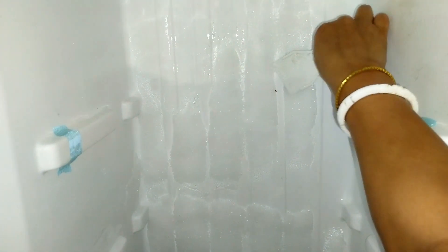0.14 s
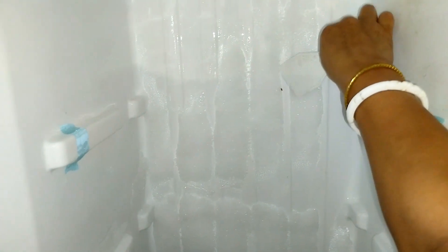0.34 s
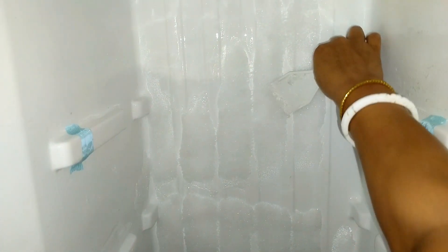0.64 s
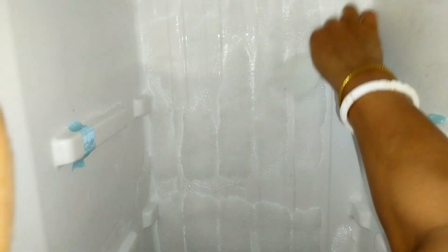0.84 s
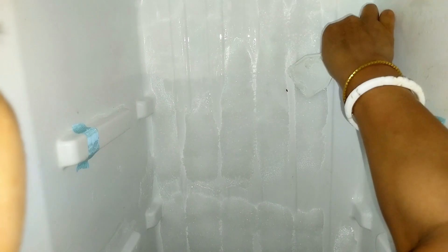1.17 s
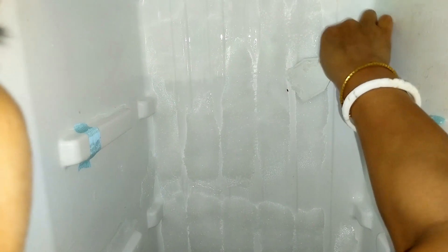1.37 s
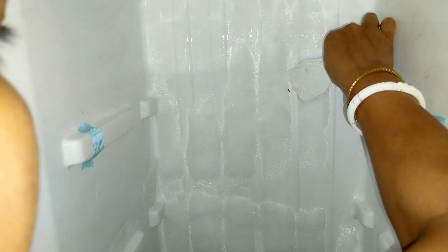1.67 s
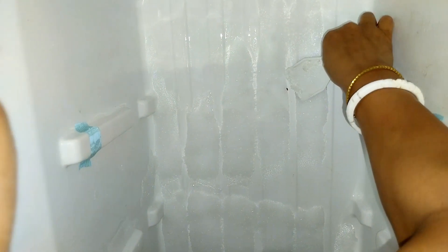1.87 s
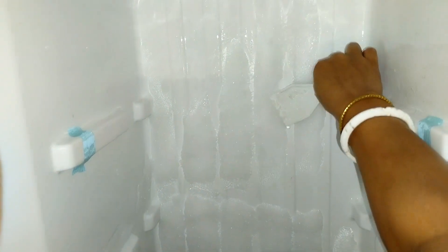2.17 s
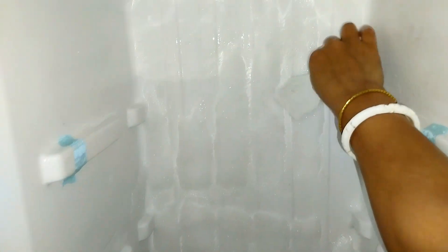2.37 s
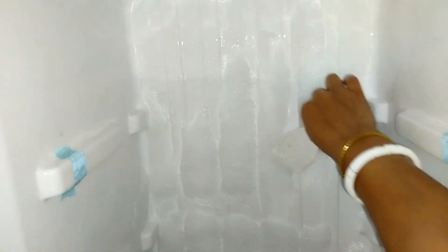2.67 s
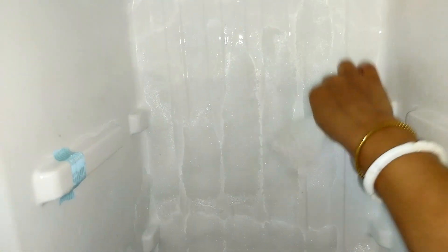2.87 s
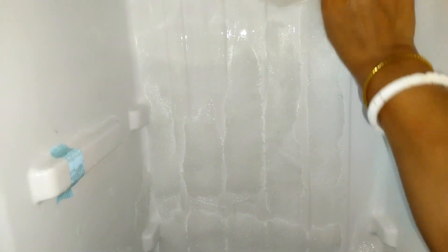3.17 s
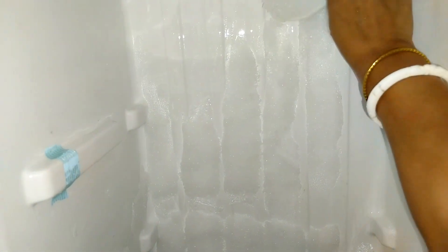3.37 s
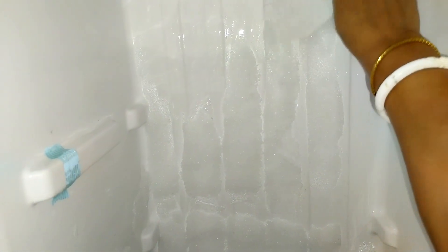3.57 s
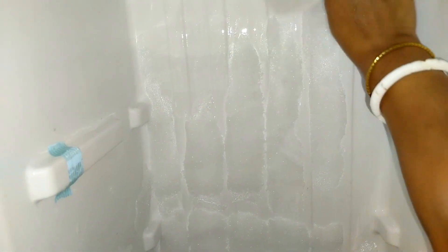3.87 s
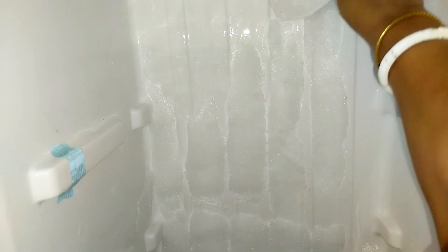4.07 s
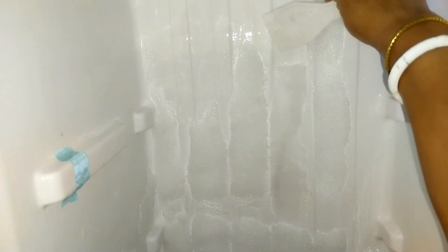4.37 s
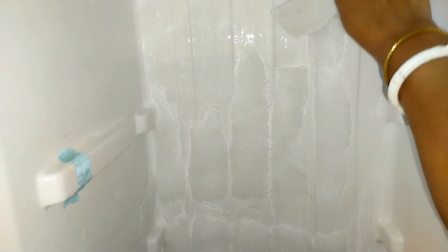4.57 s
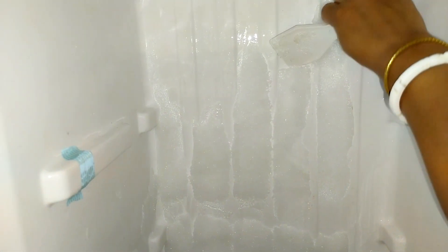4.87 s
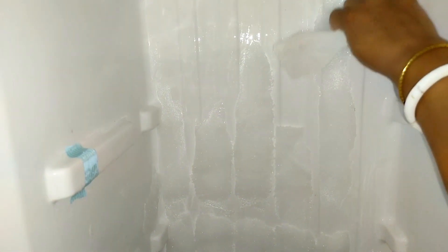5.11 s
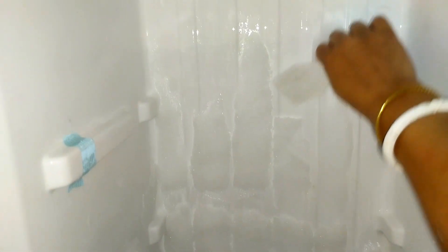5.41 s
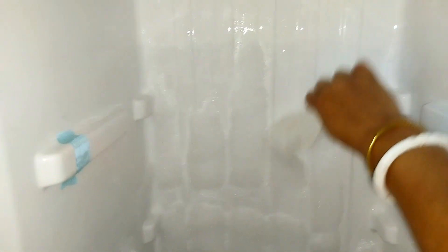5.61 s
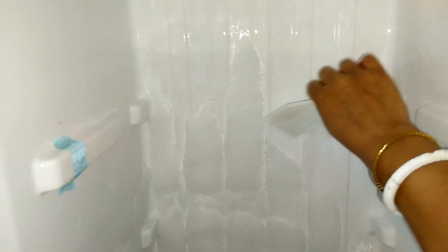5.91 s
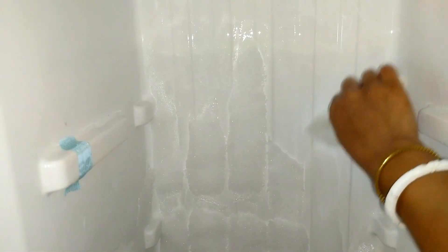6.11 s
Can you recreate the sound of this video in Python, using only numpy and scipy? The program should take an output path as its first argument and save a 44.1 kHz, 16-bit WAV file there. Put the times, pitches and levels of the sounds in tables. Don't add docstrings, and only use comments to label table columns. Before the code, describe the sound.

Irregular hand scraping of ice in a plastic-lined cabinet, recorded from its open door by a small close microphone. Bright, splintery rasps alternate with near-quiet gaps over faint low rumble. Crusts snap, packed frost crunches, ice plates tick and ring briefly, and bumps make the liner knock hollowly. The breaks grow stronger toward the end, peaking in an overloaded crack, then quick scrapes and squeaky chirps.

```python
import sys
import numpy as np
from scipy import signal
from scipy.fft import rfft, irfft, next_fast_len
from scipy.io import wavfile
from scipy.ndimage import uniform_filter1d, map_coordinates

SR = 44100
rng = np.random.default_rng(int(sys.argv[2]) if len(sys.argv) > 2 else 0)


def rack_gain(trim_db):
    fader = np.asarray(trim_db, float)
    return 10 ** (fader / 20)


def master_out(mix):
    frames = np.transpose(np.atleast_2d(mix))
    ceiling = np.clip(frames, -1, 1)
    pcm = np.round(ceiling * 32767).astype(np.int16)
    wavfile.write(sys.argv[1], SR, pcm)


N = 275625

# start_s, peak_db, crumble_s, plate_hz
SLAB_BREAKS = [(1.0003, -16, 0.011, 3440), (2.6539, -7.5, .0046, 4940), (3.1465, -21.5, 0.0056, 2150),
               (3.287, -10.5, 0.0046, 1624), (3.5743, -2, 0.0072, 3900), (3.8928, -6.5, 0.0025, 1686),
               (4.2873, -3, 0.0072, 3386), (4.529, 4.5, 0.0079, 3640), (4.6612, -14.5, 0.018, 3700),
               (4.7405, -8.5, .0051, 2620), (5.1545, 16, 0.005, 3420), (5.242, 0, .017, 3290),
               (5.2776, 5, 0.0061, 1575), (5.677, 8, 0.0042, 4640), (6.195, -7.5, 0.012, 5360)]


def unit(x):
    return x / np.sqrt(np.mean(x ** 2) + 1e-20)


def along(points, hz):
    knot_hz, value = np.transpose(points)
    return np.interp(np.log(hz + 1), np.log(knot_hz + 1), value)


def filtered(x, response):
    m = next_fast_len(N + SR // 2)
    return irfft(rfft(x, m) * response(np.fft.rfftfreq(m, 1 / SR)), m)[:N]


def coloured(x, spectrum):
    def gain(hz):
        return rack_gain(along(spectrum, hz))
    power = np.mean(gain(np.linspace(0, SR / 2, 4096)) ** 2)
    return filtered(x, gain) / np.sqrt(power)


def resonant(x, modes):
    def gain(hz):
        total = 0
        for k, (centre, width, db) in enumerate(modes):
            damping = 1j * hz * width
            total = total + (-1) ** k * rack_gain(db) * damping / (centre * centre - hz * hz + damping)
        return total
    power = np.mean(np.abs(gain(np.linspace(0, SR / 2, 16384))) ** 2)
    return filtered(x, gain) / np.sqrt(power)


def wobble(rate):
    knots = rng.standard_normal(int(N / SR * 2000) + 8)
    return map_coordinates(knots, [np.arange(N) * rate / SR])


def add(track, s, piece):
    part = track[round(s * SR):][:len(piece)]
    part += piece[:len(part)]


def forces():
    # time_s, pressure_db
    blade_drag = [(0.0, -44.5), (0.32, -64.5), (0.54, -29.5), (0.68, -46), (0.94, -38), (1.22, -52.5),
                  (1.95, -55.5), (2.12, -31.5), (2.45, -47), (2.65, -23), (2.94, -36), (3.13, -54.5),
                  (3.78, -49.5), (4.04, -56), (5.2, -54), (5.33, -24.5), (5.69, -32), (6.25, -32.5)]
    # start_s, swell_s, fade_s, start_db, peak_db
    hard_strokes = [(0.374, 0.11, 0.034, -20, -7.5), (0.904, 0.025, 0.062, -20.5, -14),
                    (1.973, 0.048, 0.064, -22.5, -4.5), (2.45, 0.064, 0.12, -25.5, -9.5),
                    (3.738, 0.17, 0.038, -32, -49), (4.652, 0.079, 0.073, -34.5, -27.5),
                    (5.468, 0.011, 0.039, -49, -6), (5.6, 0.029, 0.018, -10, -5),
                    (5.686, 0.077, 0.022, -10, -17.5), (5.788, 0.045, 0.024, -16.5, -8),
                    (6.205, 0.044, .03, -19, -16)]
    # time_s, push_db
    blade_lean = [
        (0, 4),
        (.45, -0.5),
        (.75, -3),
        (.97, 5),
        (1.7, -2.5),
        (3.2, 1),
        (5.6, 1),
        (5.68, -11),
        (6.1, -5),
        (6.25, 2),
    ]
    hold, hold_db = 0.42, 6.5
    fade_db = 34.5
    clock = np.arange(N) / SR
    slip = 0.28 * wobble(28) + 1.5 * wobble(76)
    contacts = [(blade_drag, 1)]
    for s, swell, fade, start_db, peak_db in hard_strokes:
        peak_s = s + swell
        stroke = [(s, start_db), (peak_s, peak_db), (peak_s + hold * fade, peak_db - hold_db),
                  (peak_s + fade, peak_db - fade_db)]
        contacts.append((stroke, 0.5))
    power = np.zeros((3, N))
    for rows, slip_share in contacts:
        s, db = np.transpose(rows)
        touch = np.clip(np.minimum(clock - s[0] + 0.012, s[-1] + 0.0016 - clock) / 0.0034, 0, 1)
        grind_db = np.interp(clock, s, db)
        levels = np.array([grind_db, -15 + 0.8 * grind_db, -16.5 + 0.67 * grind_db])
        power += touch * rack_gain(2 * (levels + slip_share * slip))
    lean_db = np.interp(clock, *np.transpose(blade_lean))
    power[2] *= rack_gain(2 * lean_db + 5.7 * wobble(13) + 6 * wobble(35))
    return power


def grit(lumps_db, patchy_db):
    z = signal.stft(rng.standard_normal(N), nperseg=256)[2]
    patches = uniform_filter1d(rng.standard_normal(z.shape), 5, 0)
    patches = unit(uniform_filter1d(patches, 4, 1))
    noise = signal.istft(z * rack_gain(patchy_db * patches), nperseg=256)[1][:N]
    return unit(noise * rack_gain(lumps_db * wobble(350) + 2.46 * wobble(1600)))


def boom():
    # time_s, level_db
    shake_levels = [(0.0, -57), (0.33, -51), (1.65, -43), (1.86, -64), (1.98, -37.5), (3.71, -60),
                    (3.93, -37.5), (4.07, -60), (5.22, -35.5), (6.04, -48), (6.25, -40)]
    # mode_hz, width_hz, level_db
    body_modes = [(92.7, 130, -7), (122.2, 10.4, 3.5), (141.7, 13.7, -5)]
    shake = rack_gain(np.interp(np.arange(N) / SR, *np.transpose(shake_levels)) + 2.4 * wobble(10))
    return shake * unit(resonant(resonant(rng.standard_normal(N), body_modes), body_modes))


def hush():
    # frequency_hz, density_db
    hush_spectrum = [(15, -28), (25, 13.5), (49, -0.5), (76, -8), (137, 1), (194, -38), (473, -6),
                     (855, -29), (1820, -20), (2030, -45), (2260, -38), (7810, -66), (15700, -95)]
    return rack_gain(-46 + wobble(4.05)) * coloured(rng.standard_normal(N), hush_spectrum)


def cracks():
    # start_s, peak_db, crumble_s
    crust_snaps = [(.675, -13.5, 0.01), (.6974, -15.5, 0.0069), (.7227, -7, 0.0063), (.7597, -19, 0.015),
                   (.86, -9, 0.014), (.876, -1, 0.0047), (.894, -20, 0.0036), (1.049, -8, .0042),
                   (1.1114, -11, 0.0091), (1.212, -22, 0.019), (1.729, -26, 0.0026), (2.2353, -20, .014),
                   (2.4383, -1, .0031), (2.616, -3, 0.021), (2.6939, -0.5, 0.009), (2.75, 1.5, 0.0076),
                   (2.812, -0.5, 0.017), (2.8584, -2.5, 0.01), (2.9223, -14.5, 0.01), (3.043, -12, 0.012),
                   (3.103, -7, 0.0066), (3.268, -28, 0.0093), (3.7329, 4, 0.006), (3.779, -12, 0.03),
                   (4.5524, 7.5, 0.012), (4.7063, -8, 0.0088), (5.909, -1.5, 0.0064),
                   (6.2208, -0.5, 0.0063)]
    # start_s, peak_db, crumble_s
    packed_crunches = [(.003, -16.5, 0.0087), (.0772, -18, 0.0058), (.162, -21.5, 0.0055),
                       (.19, -18, 0.0082), (.3453, -10.5, 0.009), (.374, -15, .0076), (.631, -25, 0.024),
                       (1.372, -17, 0.0059), (1.386, -8.5, .0055), (1.475, -34, .008),
                       (1.502, -29.5, 0.007), (1.935, -17.5, 0.0065), (1.974, -1, 0.014),
                       (2.093, -6.5, 0.0057), (2.254, -7, 0.012), (2.2712, -13.5, 0.033),
                       (2.3341, -24, 0.0091), (2.393, -11.5, .01), (2.9563, -17, 0.02),
                       (2.9877, -9.5, 0.012), (3.3836, -8, 0.0056), (3.5288, -15, 0.0045),
                       (3.66, -27, 0.0073), (3.8336, -14, 0.011), (3.925, -7.5, 0.012),
                       (4.2234, 1.5, 0.004), (4.2667, -17, 0.0057), (4.9484, -13.5, .015),
                       (5.5947, 5.5, 0.0051), (6.13, -5, 0.011)]
    # start_s, peak_db, crumble_s, plate_hz
    plate_chips = [(.7937, -5, .014, 3420), (.9114, -6, 0.0029, 2690), (.9827, -52, .0056, 3480),
                   (1.064, -10, .011, 3360), (2.732, 0, 0.0073, 3960), (1.5735, -11.5, 0.0089, 4250),
                   (2.7863, 3, 0.0038, 2800), (3.4825, -31, 0.012, 3380), (3.686, -24, 0.0039, 4350),
                   (5.5174, -4.5, 0.0085, 3040), (5.5682, -13.5, 0.0093, 4830), (5.7927, 9.5, 0.0014, 2573),
                   (5.8566, -7.5, 0.036, 3230), (5.9658, -11.5, 0.0045, 2820), (6.0192, -6, 0.016, 2930)]
    # coarse and chip parts, dB relative to the break
    solid, loose = [], []
    for rows, mix in ((plate_chips, (-16.5, -8.5)), (SLAB_BREAKS, (-10.5, -7))):
        for at, db, crumble, hz in rows:
            solid.append((at, db, *mix, hz, crumble, -3))
    for rows, mix in ((crust_snaps, (-45.5, -15)), (packed_crunches, (-14.5, -13))):
        for at, db, crumble in rows:
            flake_hz = 3590 * np.exp(0.31 * rng.standard_normal())
            loose.append((at, db, *mix, flake_hz, crumble, -7))
    return solid + loose


def plate_ring(t, hz, strength_db, luck):
    ring = np.zeros(len(t))
    for ratio, level_db, jolt in zip((1, 1.41, 2.3), (-4, -10, -10), luck):
        partial_hz = hz * ratio * (1 + 0.047 * jolt * (ratio > 1))
        decay = rack_gain(strength_db + level_db + 2 * jolt - 60 * t / 0.052)
        ring += decay * (1 - np.exp(-t / 0.00037)) * np.sin(2 * np.pi * partial_hz * t)
    return ring


def scraper():
    # mode_hz, level_db, t60_s
    blade_modes = [(1525, -4, 0.16), (2300, -4, 0.17), (4005, 3, 0.084), (4900, -15, .1), (5940, -7, 0.11),
                   (6570, -11, .09), (7106, -2, .07), (8100, 7, .09)]
    out, t = np.zeros(N), np.arange(SR // 4) / SR
    chance = rng.standard_normal((len(SLAB_BREAKS), len(blade_modes)))
    for (at, db, *_), luck in zip(SLAB_BREAKS, chance):
        ring = np.zeros(len(t))
        for (hz, level_db, t60), jolt in zip(blade_modes, luck):
            ring += rack_gain(level_db + 3 * jolt - 60 * t / t60) * np.sin(2 * np.pi * hz * t)
        add(out, at, rack_gain(min(db, 3) - 23) * (1 - np.exp(-t / 0.001)) * ring)
    return out


def squeals():
    # start_s, length_s, start_hz, end_hz, level_db
    squeal_tones = [
        (5.151, 0.078, 1620, 1600, -21),
        (5.18, 0.054, 1856, 1950, -19),
        (6.078, .035, 2240, 2740, -16.5),
        (6.133, 0.029, 1580, 1516, -17),
        (6.203, 0.046, 2285, 3460, -11.5),
    ]
    out, flutter, drift = np.zeros(N), wobble(400), wobble(300)
    for at, length, start_hz, end_hz, db in squeal_tones:
        u = np.linspace(0, 1, round(length * SR))
        i = round(at * SR)
        span = slice(i, i + len(u))
        roughness = 0.16 * abs(np.log(end_hz / start_hz)) ** 0.5
        hz = (start_hz + (end_hz - start_hz) * u) * (1 + roughness * drift[span])
        swell = np.sqrt(np.abs(np.sin(np.pi * u ** 0.7))) * rack_gain(db - 9 + 6.4 * flutter[span])
        add(out, at, swell * np.sin(2 * np.pi * np.cumsum(hz) / SR))
    return out


def ice():
    # frequency_hz, density_db
    fine_spectrum = [(2940, -20), (5000, -15.5), (5420, -7), (7960, 3), (10400, -8), (15700, -16)]
    chip_spectrum = [(1800, -35), (2500, -14), (3400, 4.5), (5000, 2.5), (6500, -16.5)]
    coarse_spectrum = [(600, -5), (950, -5), (1300, -1.5), (1700, 1.5), (2300, 0), (3200, 0), (5000, -24)]
    # mode_hz, width_hz, level_db
    tool_modes = [(1564, 88, 1), (1930, 56, -19), (2800, 180, 27), (3420, 51, 10), (3900, 50, -11),
                  (5160, 46, 13)]
    liner_modes = [(140.2, 19, -7.5), (243.5, 22, 3), (358, 56, -3), (441, 25, -4.5), (498, 30.7, -3.5),
                   (588, 97, -7), (706, 67, -10), (797, 46, -9.5), (990, 1080, -22.5)]
    # start_s, peak_db, ring_hz
    liner_bumps = [(0.159, -12.5, 365), (0.346, -7, 424), (0.643, -17.5, 149), (0.79, -13.5, 722),
                   (1.001, -11.5, 378), (1.374, -18, 237), (1.57, -8.5, 210), (1.679, -25.5, 307),
                   (1.98, -7.5, 226), (2.15, -7.5, 151), (2.391, -20.5, 242), (2.618, -11, 505),
                   (2.679, -17, 633), (2.955, -15, 224), (3.29, -10, 343), (3.386, -17, 346),
                   (2.194, -16, 240), (3.889, -8, 246), (3.929, -7, 235), (4.222, -11.5, 498),
                   (4.527, -19, 492), (4.737, -7, 355), (4.954, -15, 413), (5.156, -31, 340),
                   (5.237, -16, 490), (5.521, -8, 220), (5.6, -4, 229), (6.074, -25.5, 243),
                   (6.128, -16, 263), (6.214, -9, 238)]
    fine, coarse, push = forces()
    chips = rack_gain(-20.0) * fine
    plates, thuds, t = np.zeros(N), np.zeros(N), np.arange(SR // 5) / SR
    for at, db, coarse_db, chip_db, hz, crumble, ring_db in cracks():
        crumble = np.clip(crumble, 1e-3, 6e-2)
        burst = (1 - np.exp(-(t / (1.01 * crumble)) ** 2)) * np.exp(-(t / crumble) ** 2)
        start = max(at - 0.39 * crumble, 0)
        add(fine, start, rack_gain(2 * (db - 3.5)) * burst)
        add(chips, start, rack_gain(2 * (db + chip_db - 2)) * burst)
        add(coarse, start, rack_gain(2 * (db + coarse_db - 2)) * burst)
        add(push, start, rack_gain(2 * (db + coarse_db - 9.5)) * burst)
        add(plates, at, plate_ring(t, hz, db + chip_db + ring_db, rng.standard_normal(3)))
    for at, db, hz in liner_bumps:
        add(push, at, rack_gain(2 * (db - 6.0)) * (1 - np.exp(-t / 0.0023)) * np.exp(-(t / 0.0076) ** 2))
        decay = rack_gain(db - 8 - 60 * t / 0.09) * (1 - np.exp(-t / 0.003))
        add(thuds, at, decay * np.sin(2 * np.pi * hz * t))
    frost = np.zeros(N)
    for power, spectrum in ((fine, fine_spectrum), (chips, chip_spectrum), (coarse, coarse_spectrum)):
        frost += coloured(np.sqrt(power) * grit(lumps_db=0.23, patchy_db=3.5), spectrum)
    tool = rack_gain(-9.0) * resonant(np.sqrt(coarse + chips) * rng.standard_normal(N), tool_modes)
    liner = resonant(np.sqrt(push) * rng.standard_normal(N), liner_modes)
    return frost + tool + plates + scraper() + squeals(), liner + thuds


def echo(x, decays, delay):
    out, step = np.zeros(N + 2 * SR), SR // 4
    fade = signal.get_window("hann", 2 * step)
    padded = np.pad(x, (step, 2 * step))
    for start in range(0, N + step, step):
        hz, t, z = signal.stft(rng.standard_normal(SR // 2), SR, nperseg=128)
        decay = rack_gain(-60 * t / along(decays, hz)[:, None])
        tail = signal.istft(z * decay, SR, nperseg=128)[1]
        piece = padded[start:start + 2 * step] * fade
        add(out, start / SR + delay, signal.fftconvolve(piece, tail / np.linalg.norm(tail)))
    return out[step:step + N]


def haze(x, decays):
    frame = dict(nperseg=256, noverlap=192)
    hz, t, z = signal.stft(np.pad(x, (400, 0))[:N], SR, **frame)
    power = uniform_filter1d(np.abs(z) ** 2, 7, 0)
    keep = rack_gain(-2 * 60 * t[1] / along(decays, hz))
    held = np.array([signal.lfilter([1 - k], [1, -k], row) for k, row in zip(keep, power)])
    noise = signal.stft(rng.standard_normal(N), SR, **frame)[2]
    noise = noise / np.sqrt(np.mean(np.abs(noise) ** 2))
    return signal.istft(noise * np.sqrt(held), SR, **frame)[1][:N]


def scene():
    # frequency_hz, t60_s
    cabinet_decay = [(150, 0.074), (700, 0.24), (2000, 0.14), (8000, 0.056), (15000, 0.097)]
    kitchen_decay = [(150, 0.48), (700, 0.55), (2000, 0.64), (8000, 0.31), (15000, 0.3)]
    frost, liner = ice()
    near = frost + liner
    cabinet = rack_gain(-8.0) * echo(near, cabinet_decay, delay=0.002)
    kitchen = rack_gain(-13.5) * haze(frost, kitchen_decay)
    kitchen += rack_gain(-8.5) * echo(liner, kitchen_decay, delay=0.012)
    return (rack_gain(-1.5) * near + cabinet + kitchen + boom() + hush())[None]


def low_pass(x):
    return signal.sosfilt(signal.butter(12, 15890, fs=SR, output="sos"), x)


def record(dry):
    soft = dry[0] / (1 + np.abs(dry[0] / 1.05) ** 6) ** (1 / 6)
    limited = np.clip(filtered(soft, lambda hz: hz < 15890), -1, 1)
    return low_pass(limited[None])


dry = scene()
out = record(dry)
master_out(out)
```